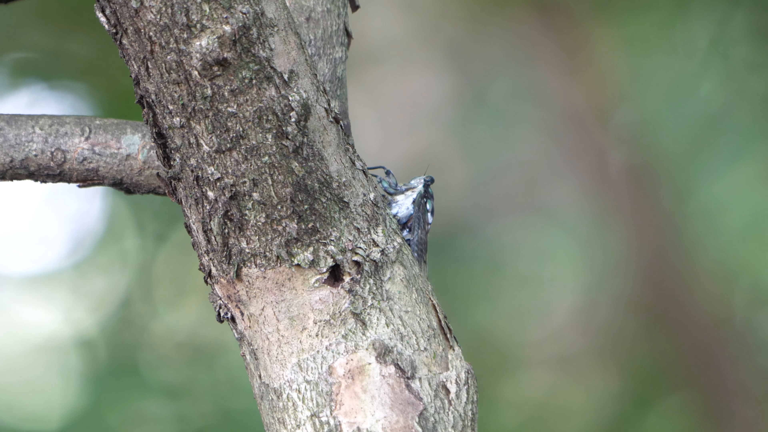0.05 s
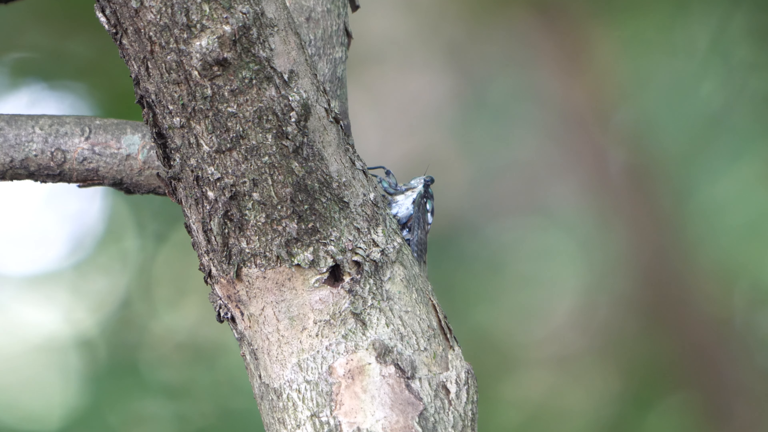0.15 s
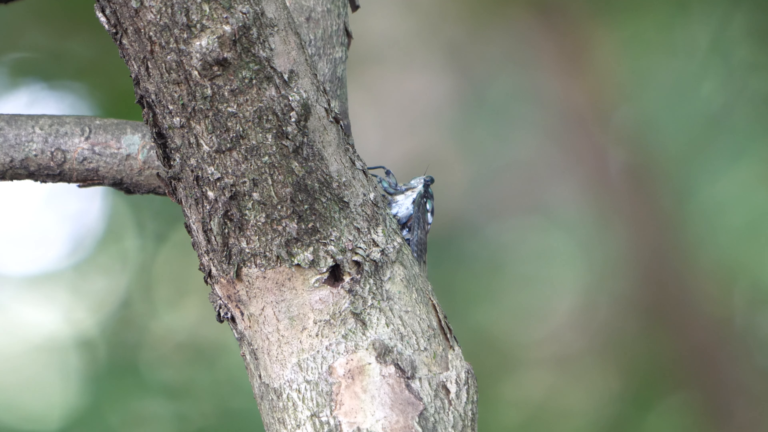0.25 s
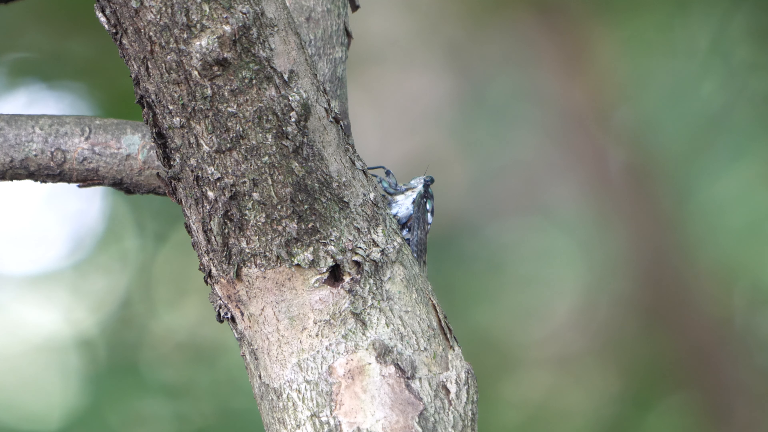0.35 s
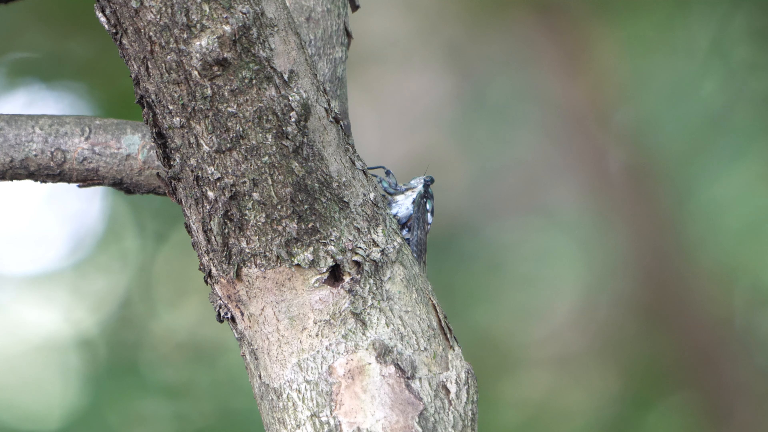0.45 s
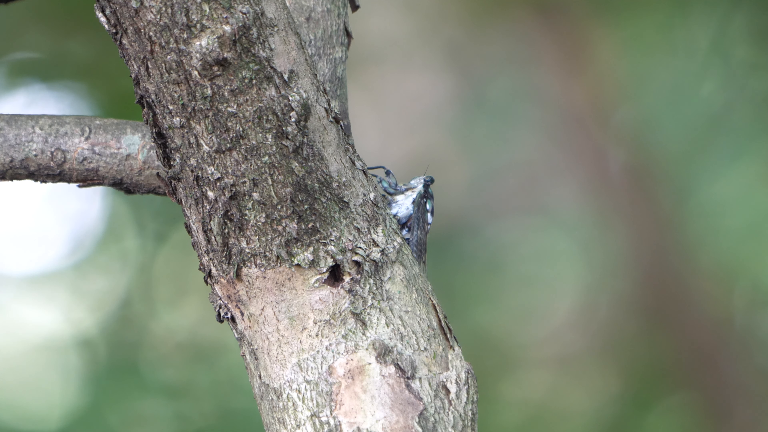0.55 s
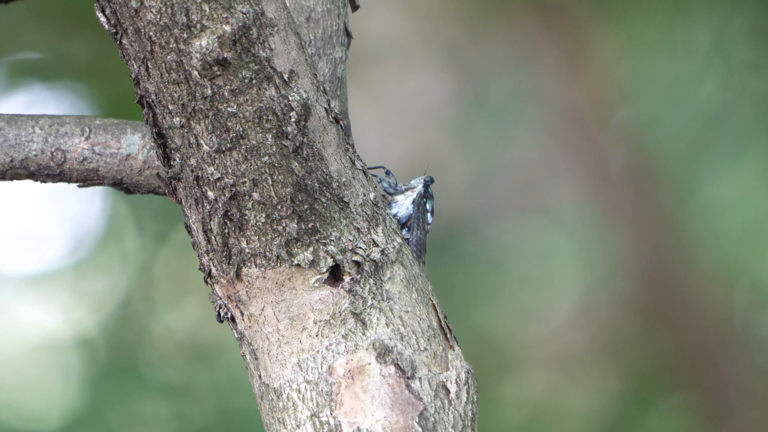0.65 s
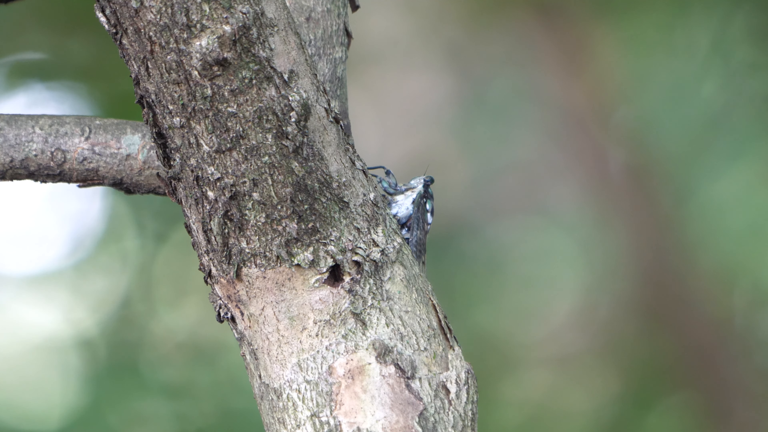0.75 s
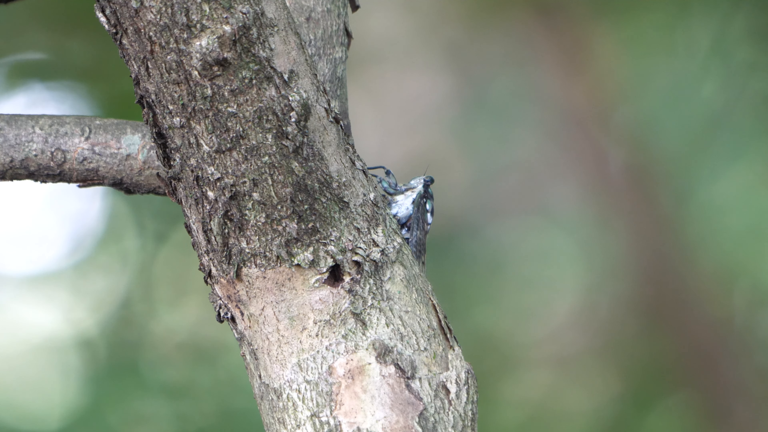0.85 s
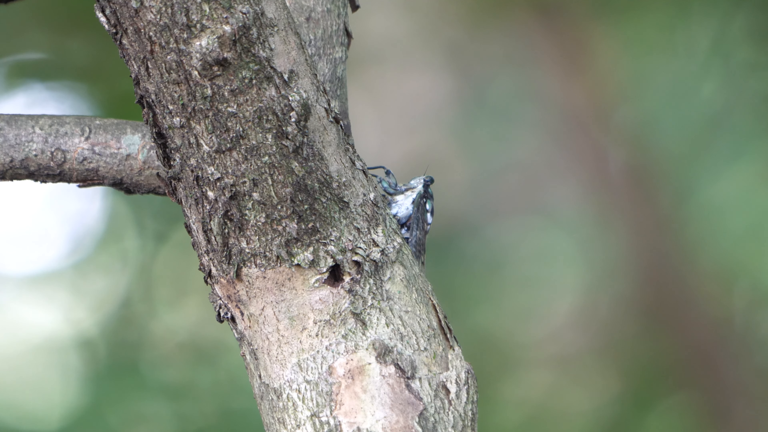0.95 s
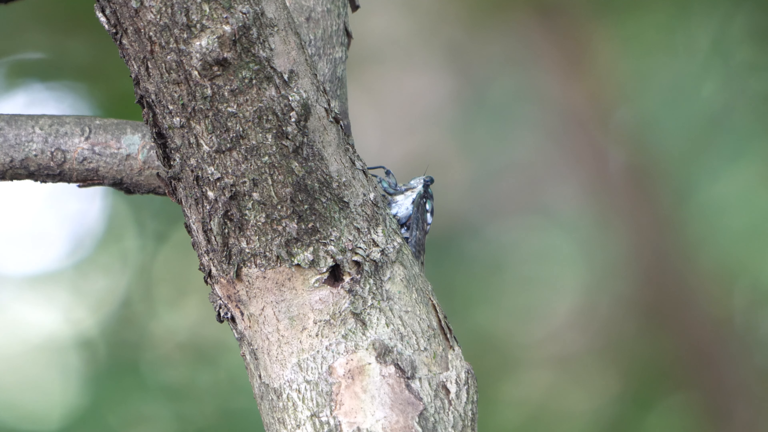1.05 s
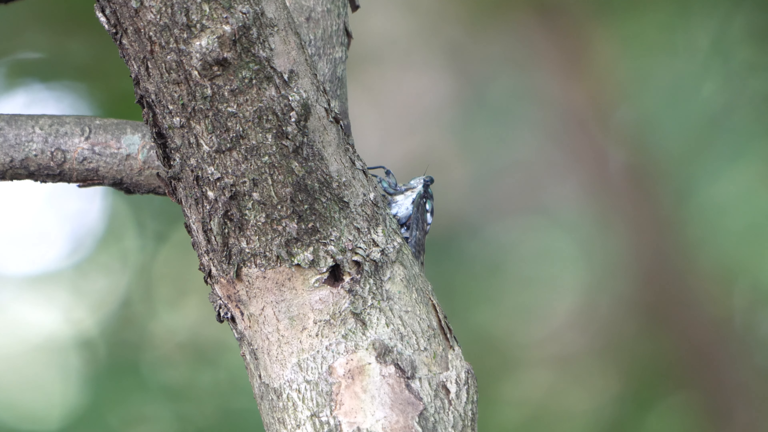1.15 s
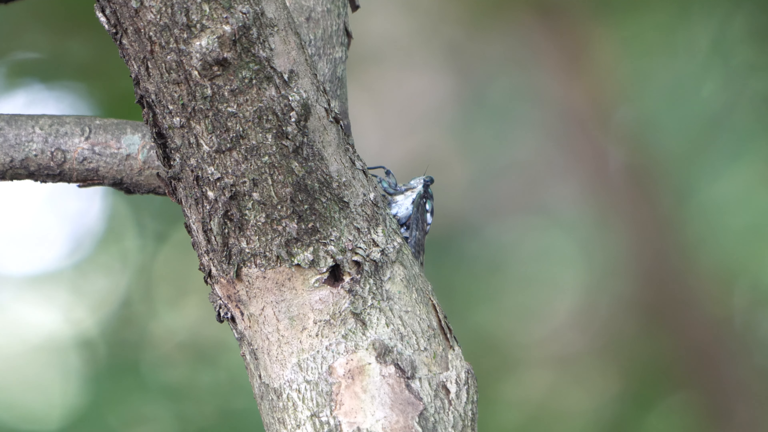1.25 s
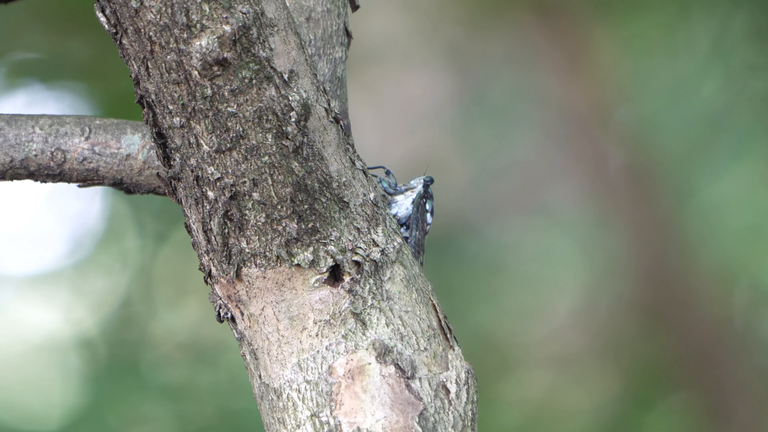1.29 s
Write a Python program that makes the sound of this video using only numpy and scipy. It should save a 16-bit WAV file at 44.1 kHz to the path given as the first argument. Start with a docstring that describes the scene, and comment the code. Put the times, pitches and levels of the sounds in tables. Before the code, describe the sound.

A close cicada rattles dryly, climbs into a whining call, ticks through short pauses, then rattles and whines again over a distant cicada chorus.

```python
"""A cicada on a trunk, first heard well into a long dry rattle, goes into a rising whine.
Pauses of thin ticking and two short notes follow, then a fast rattle that runs down; then whine, pause, note.
Two tymbals click in turn into a hollow belly, whose resonance moves as it stretches and relaxes.
Throughout: a far chorus of buzzing resonators with single swells, fuzzy noise whistles at times,
and a low rumble of distant traffic made of filtered noise."""
import sys
import numpy as np
from scipy import signal
from scipy.fft import rfft, irfft
from scipy.io import wavfile
from scipy.ndimage import uniform_filter1d

SR = 44100
rng = np.random.default_rng(int(sys.argv[2]) if len(sys.argv) > 2 else 0)


def store_wav(level_fs):
    """Save 16-bit WAV to argv[1]."""
    pcm = np.round(np.clip(np.atleast_2d(level_fs), -1, 1) * 32767)
    wavfile.write(sys.argv[1], SR, pcm.T.astype(np.int16))


N = 366030
TIME = np.arange(N) / SR
WAVERS_PER_S = 5.83  # corner scale of the singer's slow drifts


def gain_of(db):
    """dB to amplitude ratio."""
    return 10 ** (np.asarray(db) / 20)


def evened(x):
    """Scales to rms 1."""
    return x / np.sqrt(np.mean(x ** 2) + 1e-20)


def levelled(x, size):
    """Holds the running rms near 1; size in samples."""
    power = uniform_filter1d(uniform_filter1d(x ** 2, size), size)
    return x / np.sqrt(abs(power) + 1e-20)


def follow(rows, at):
    """Interpolates each later column of a table linearly along its first."""
    places, *columns = np.transpose(rows)
    return [np.interp(at, places, column) for column in columns]


def wander(hz):
    """Gaussian low-passed noise of rms 1: a slow random drift."""
    roll_off = np.exp(-(np.fft.rfftfreq(N, 1 / SR) / hz) ** 2)
    return evened(irfft(rfft(rng.standard_normal(N)) * roll_off, N))


def colour(x, points, size=8192):
    """Minimum-phase filter through (f/Hz, level/dB) points."""
    hz, db = np.transpose(points)
    bin_hz = abs(np.fft.fftfreq(size, 1 / SR))
    log_gain = np.log(gain_of(np.interp(np.log(bin_hz + 1), np.log(hz), db)))
    taps = np.fft.ifft(np.exp(np.conj(signal.hilbert(log_gain)))).real
    return signal.oaconvolve(x, taps[:size // 2])[:N]


def resonate(x, hz, width_hz):
    """One-pole resonance of peak gain 1, at a fixed or moving frequency."""
    turn = np.exp(2j * np.pi * np.cumsum(hz * np.ones(N)) / SR)
    r = np.exp(-np.pi * width_hz / SR)
    shifted = x / turn + 1e-18
    return 2 * (turn * signal.lfilter([1 - r], [1, -r], shifted)).real


def spread(x, hz, width_hz):
    """All-pass ringing: draws clicks out in time, magnitude spectrum unchanged."""
    r = np.exp(-np.pi * width_hz / SR)
    poles = np.array([1, -2 * r * np.cos(2 * np.pi * hz / SR), r * r])
    return signal.lfilter(poles[::-1], poles, x)


def scatter(x, t60_s, size=20000):
    """Sparse decaying echoes from bark, branches and leaves, of energy 1."""
    t_s = np.arange(size) / SR
    taps = rng.standard_normal(size) * (rng.random(size) < .1) * 1000 ** (-t_s / t60_s)
    return signal.oaconvolve(x, taps / np.linalg.norm(taps))[:N]


def wood(x, count=3):
    """Independently fluttering echo sets, which blur the overtones."""
    echoes = sum(scatter(x * wander(45), t60_s=.18) for _ in range(count))
    return echoes / np.sqrt(count)


def strokes(rate, lag, jitter_s, uneven_db):
    """One band-limited click per cycle, lag cycles late, random in timing and size."""
    turns = np.cumsum(rate) / SR - lag
    at = np.flatnonzero(np.diff(np.floor(turns)) > 0)
    late, size = rng.standard_normal((len(at), 2)).T
    to_crossing_s = (np.ceil(turns[at]) - turns[at]) / rate[at]
    place = at + SR * (to_crossing_s + late * (jitter_s * np.ones(N))[at])
    near = np.floor(place).astype(int)[:, None] + np.arange(-8, 9)
    off = near - place[:, None]
    clicks = np.sinc(off) * np.sinc(off / 9)  # windowed sinc: sub-sample placement
    clicks *= gain_of(size * (uneven_db * np.ones(N))[at])[:, None]
    return np.bincount(np.clip(near, 0, N - 1).ravel(), clicks.ravel(), N)


def raggedness(rate):
    """0 for fast even strokes, 1 for a slow rattle."""
    return np.clip((182 - rate) / 45, 0, 1) ** 1.4


# colour of a tymbal click: f/Hz, level/dB
CLICK_COLOUR = [(900, -43.5), (1500, -15), (2000, -7), (2500, 1.5), (3000, 4.5), (3500, 5), (4400, 1.5),
                (5200, 0.5), (5600, -4), (6000, -8.5), (6400, -2), (6800, -4), (7150, -5), (7520, -11),
                (7700, -6.5), (8000, -7.5), (8600, -12.5), (9200, -19.5), (12000, -18)]
# narrow body resonances: f/Hz, width/Hz, level/dB
BODY_MODES = [(2850, 43, 3), (3345, 110, 0), (3955, 25, 3), (4340, 150, -2.5), (4520, 170, 0.5),
              (5067, 70, -10), (5380, 200, -8), (5944, 100, 2), (6330, 190, -1.5), (6740, 89, 1)]
# lows lost as the belly stretches: belly f/Hz, lows level/dB
STRETCH_LOWS = [(3420, 2), (4470, -1.5), (4700, -1), (5000, -7)]


def song(rate, lag, belly_hz, effort_db, treble_db, tip_db):
    """Two tymbals buckle in turn into a resonant belly: even when fast, ragged when slow."""
    ragged = raggedness(rate)
    slack = np.clip((3900 - belly_hz) / 800, 0, 1)
    belly_hz = belly_hz + 30 * wander(17)
    lows_db, = follow(STRETCH_LOWS, belly_hz)
    jitter_s = 6e-6 + 1.1e-4 * ragged + 1e-5 * slack
    uneven_db = 1.2 + 1.5 * ragged
    second_lag = lag + .0025 * wander(WAVERS_PER_S)
    first = strokes(rate, 0, jitter_s, uneven_db)
    clicks = first + .84 * strokes(rate, second_lag, jitter_s, uneven_db)
    # belly stretch and opening set the balance of lows and treble
    lows = signal.sosfiltfilt(signal.butter(4, 3800, fs=SR, output="sos"), clicks)
    treble = signal.sosfiltfilt(signal.butter(2, 5600, "high", fs=SR, output="sos"), clicks)
    clicks = clicks + treble * (gain_of(treble_db) - 1) + lows * (gain_of(lows_db) - 1)
    sound = colour(resonate(resonate(clicks, belly_hz, 1970), belly_hz, 2100), CLICK_COLOUR)
    # sharp tip of the resonance picks out single overtones
    sound = sound + gain_of(tip_db) * resonate(sound, belly_hz, 180)
    modes = sum(gain_of(db) * resonate(sound, hz, width_hz) for hz, width_hz, db in BODY_MODES)
    sound = sound + modes * (1 - .19 * ragged)
    for hz, _, _ in BODY_MODES:  # body rings on between strokes
        sound = spread(sound, hz, width_hz=115)
    sound = sound + .18 * scatter(sound, t60_s=.05)
    sound = sound + gain_of(-5 + 5 * ragged) * wood(sound)
    return gain_of(effort_db + .76) * levelled(sound, size=1500)


# colour of the ticks: f/Hz, level/dB
TICK_COLOUR = [(6000, -20), (7700, -7), (9600, -23), (10600, -2), (11500, -5), (12700, 5), (13500, -7),
               (14400, -1), (15600, -12)]


def ticks(rate, ticking_db):
    """Bare tymbal snaps, near side louder; in faint ticking the echoes dominate."""
    jitter_s = 6e-6 + 2.5e-4 * raggedness(rate) ** 2
    far_side = .5 * strokes(rate, 1 / 2, jitter_s, 1.5)
    snaps = colour(strokes(rate, 0, jitter_s, .84) + far_side, TICK_COLOUR)
    bare = np.clip((ticking_db + 60) / 12, .2, 1)
    fluttering = snaps * (.9 + .45 * wander(150))
    echoes = .65 * scatter(fluttering, t60_s=.12)
    return gain_of(ticking_db) * levelled(bare * snaps + echoes, size=700)


# rattle strokes: t/s from start, rate/(strokes/s)
RATTLE_STROKES = [(0, 186), (.08, 177), (.18, 148), (.3, 124), (.52, 110), (.85, 102), (1.35, 91),
                  (1.9, 81.5), (2.5, 78)]
# surges and lulls of effort: t/s, level change/dB, belly shift/Hz
EFFORT_SURGES = [(0.09, 2, -150), (0.33, 0, 0), (0.56, 3.5, -500), (1.0, 2, 250), (1.35, 2.5, -600),
                 (1.6, -10, 0), (1.78, 4, -100), (1.98, -31, 0), (4.75, 2, 0), (5.0, -3, 100),
                 (5.18, 1.5, -550), (5.29, 2.5, 100), (5.39, -2.5, 200), (5.74, 1, -500), (5.83, -0.5, 0),
                 (5.98, 4, -250), (6.12, 2.5, -400), (6.451, -1, 300), (6.71, 2.5, -600), (6.86, 1.5, 100)]


def rattle(t, db):
    """Muscles tire, fast then slowly, with surges: strokes slow, belly relaxes, level sinks."""
    tired = t / (t + .1)
    surge_db, surge_hz = sum(np.outer(size, np.exp(-((TIME - s) / .054) ** 2))
                             for s, *size in EFFORT_SURGES)
    rate, = follow(RATTLE_STROKES, t)
    from_hz, to_hz, relax_s = 4450, 4005, .55
    belly_hz = from_hz + (to_hz - from_hz) * t / (t + relax_s)
    belly_hz = belly_hz + surge_hz + 121 * tired * wander(WAVERS_PER_S)
    drop_db, fade_db_per_s, waver_db = 6, 1.77, .94
    effort_db = db - drop_db * tired - fade_db_per_s * t + surge_db
    effort_db = effort_db + waver_db * wander(WAVERS_PER_S)
    lag, treble_db = .478, -1  # lag in cycles
    tip_db = 4 - 17 * tired
    ticking_db = -59 - 2.5 * tired
    return rate, lag, belly_hz, effort_db, treble_db, tip_db, ticking_db


# whine, belly stretches, peaks, lets go: t/s from start, belly f/Hz, effort/dB, treble/dB,
# resonance tip/dB, ticking/dB
WHINE_BELLY = [(0, 2980, -2, 12, -8, -53), (.055, 3260, -0.5, 16.5, -4, -60), (.1, 4500, -1.5, 14, -8, -59),
               (.2, 4480, -4, 15, 2, -59), (.33, 4700, -0.5, 4, -11, -59), (.45, 4870, -0.5, 9, -8, -58),
               (.53, 5030, 4.5, 4, 10, -59), (.62, 4980, 2, 8, 4.5, -57), (.69, 5080, 2, 4, 0, -58),
               (.72, 4180, 0, 13, 0, -58), (0.75, 3320, 0.5, 8, -12, -55), (.82, 3250, -2.5, -14, -19, -54),
               (.88, 3450, -3.5, -13, -10, -51)]
# whine strokes speed up, then ease: t/s from start, rate/(strokes/s), second tymbal lag/cycles
WHINE_STROKES = [(0, 178, .48), (.04, 177.8, .48), (.085, 173.7, .475), (.16, 175.4, .473),
                 (.27, 179, .478), (.37, 181.8, .481), (.48, 184.2, .482), (.58, 186.4, .482),
                 (.7, 188.9, .482), (.735, 190.6, .478), (.78, 189.3, .472), (.88, 188, .472)]


def whine(t, db, held_s):
    """Fast strokes into a stretching belly give a rising call, its top held for held_s more."""
    t = t - np.clip(t - .66, 0, held_s)
    belly_hz, effort_db, treble_db, tip_db, ticking_db = follow(WHINE_BELLY, t)
    rate, lag = follow(WHINE_STROKES, t)
    return rate, lag, belly_hz, db + effort_db, treble_db, tip_db, ticking_db


# near-steady strokes of pauses and notes: t/s, rate/(strokes/s), second tymbal lag/cycles
STEADY_STROKES = [(3.09, 187.7, .48), (3.28, 185.6, .485), (3.39, 186.4, .476), (3.46, 188.3, .472),
                  (3.6, 188.3, .469), (3.93, 188, .471), (4.1, 187.4, .468), (4.17, 186.5, .468),
                  (4.22, 186.5, .447), (4.48, 186.2, .447), (7.96, 188.7, .474), (8.13, 186, .48),
                  (8.3, 186.8, .473)]


def steady_strokes():
    """Tymbals keep going almost unchanged through pauses and notes."""
    return follow(STEADY_STROKES, TIME)


def pause(t, db, belly_hz, tip_db):
    """Belly drawn in: the low hum fades while the bare ticking swells through."""
    rate, lag = steady_strokes()
    fade_db_per_s, treble_db = 23, 8
    ticking_db = np.interp(t, [0, .089], [-50.5, -45])
    return rate, lag, belly_hz, db - fade_db_per_s * t, treble_db, tip_db, ticking_db


def note(t, db):
    """One quick stretch: belly resonance climbs and treble opens."""
    rate, lag = steady_strokes()
    rise_s, close_s, tip_db = .17, .081, -12.5
    belly_hz = np.interp(t, [0, rise_s], [4250, 4850])
    treble_db = np.interp(t, [0, rise_s], [-3, 3])
    ticking_db = np.interp(t, [rise_s, rise_s + close_s], [-57, -50.5])
    return rate, lag, belly_hz, db, treble_db, tip_db, ticking_db


# Each part lasts until the next begins; levels are base efforts.
# rattles, the first already under way: t/s, level/dB
RATTLE_STARTS = [(-0.38, -23), (4.48, -21)]
# whines: t/s, level/dB, extra hold at top/s
WHINE_STARTS = [(2.22, -24.5, 0.0047), (7.05, -24.5, 0.037)]
# pauses: t/s, level/dB, belly f/Hz, resonance tip/dB
PAUSE_STARTS = [(3.09, -30.5, 3640, -15), (3.614, -29, 3270, 8), (4.18, -28, 3380, -8.5),
                (7.96, -37, 3470, -10)]
# notes: t/s, level/dB
NOTE_STARTS = [(3.384, -25.5), (3.955, -23), (8.22, -28)]


def performance():
    """Joins the parts into smoothed controls: rate, lag, belly, effort, treble, tip, ticking."""
    kinds = (whine, WHINE_STARTS), (pause, PAUSE_STARTS), (note, NOTE_STARTS), (rattle, RATTLE_STARTS)
    parts = [(row, part) for part, table in kinds for row in table]
    parts.sort(key=lambda pair: pair[0])
    controls = np.zeros(N)
    for (start_s, *settings), part in parts:
        t = np.maximum(TIME - start_s, 0)
        values = np.broadcast_arrays(*part(t, *settings))
        controls = np.where(TIME >= start_s, values, controls)
    change_s = .032  # passage from part to part
    rate, *others = uniform_filter1d(controls, round(change_s * SR), axis=1)
    return rate * (1 + .00119 * wander(WAVERS_PER_S)), *others


# colour of the far chorus: f/Hz, level/dB
CHORUS_COLOUR = [(900, -50), (1500, -21.5), (2000, -11), (2500, -2.5), (3100, 5), (4100, -1), (4700, -4.5),
                 (5400, -5.5), (5900, -7.5), (6600, -11), (7500, -23), (9200, -41), (10500, -24),
                 (12700, -54), (15000, -70)]
# loudness of the far chorus: t/s, level/dB
CHORUS_LEVEL = [(0, -27), (2, -27), (2.8, -25.5), (3.3, -26.5), (3.8, -27), (4.35, -27.5), (5, -29),
                (6.5, -28.5), (7.6, -26.5), (8.05, -27.5), (8.3, -25)]


def chorus(count=4):
    """Far cicadas: click trains in drifting resonances, smeared by the trees."""
    voices = np.zeros(N)
    for rate in np.linspace(150, 200, count):
        stretch = wander(2.2)  # belly opens: faster, higher, louder
        clicks = strokes(rate * (1 + .02 * stretch), 0, 2e-5, 3)
        belly_hz = 4150 + 700 * np.tanh(stretch)
        voice = gain_of(2.4 * stretch) * resonate(clicks, belly_hz, 600)
        voices += scatter(voice + .2 * clicks, t60_s=.26)
    level_db, = follow(CHORUS_LEVEL, TIME)
    return gain_of(level_db) * levelled(colour(voices, CHORUS_COLOUR), size=12000)


# single far cicadas: t/s, length/s, mid-swell belly f/Hz, peak level/dB
SWELLS = [(0.584, 0.24, 4800, -33.5), (1.603, .17, 5300, -40.5), (1.78, 0.37, 5070, -46),
          (3.673, 0.3, 4530, -33), (5.497, 0.29, 4070, -39), (5.845, 0.13, 5250, -33),
          (6.22, 0.4, 5000, -34), (6.965, 0.13, 5300, -43)]


def far_swells():
    """Single far click trains swell and fade, their resonance climbing."""
    rate, climb_hz, width_hz = 176, 200, 430  # rate in strokes/s
    out = np.zeros(N)
    for start_s, length_s, hz, db in SWELLS:
        along = np.clip((TIME - start_s) / length_s, 0, 1)
        clicks = strokes(rate * (1 + .02 * wander(WAVERS_PER_S)), 0, 5e-5, 3)
        belly_hz = hz + climb_hz * (along - .5)
        buzz = resonate(resonate(clicks, belly_hz, width_hz), belly_hz, width_hz)
        buzz = scatter(buzz, t60_s=.15)
        arch = np.sqrt(abs(np.sin(np.pi * along)))
        out += gain_of(db) * arch * levelled(buzz, size=3000)
    return out


# faint far calls: t/s, length/s, f/Hz, peak level/dB
CALLS = [(0.24, 0.07, 1210, -56), (2.84, 0.42, 1700, -60), (3.4, 0.38, 1690, -61), (4.95, 0.22, 1700, -57),
         (7.694, 0.58, 1740, -57)]


def far_calls():
    """Soft fuzzy whistles from deep in the wood: arched narrow-band noise."""
    out = np.zeros(N)
    for start_s, length_s, hz, db in CALLS:
        along = np.clip((TIME - start_s) / length_s, 0, 1)
        arch = np.sqrt(abs(np.sin(np.pi * along)))
        whistle = resonate(resonate(rng.standard_normal(N), hz, 110), hz, 110)
        out += gain_of(db) * arch * evened(whistle)
    return out


# relative spectrum of distant traffic: f/Hz, level/dB
RUMBLE_COLOUR = [(20, -31), (45, -14), (64, -4.5), (100, -1.5), (160, -4), (230, -3), (340, -7.5),
                 (440, -4.5), (600, -10), (1100, -12.5), (1600, -14), (3000, -2.5), (9000, -24),
                 (15000, -42)]
# drone in the traffic: f/Hz, width/Hz, level/dB
DRONE_BANDS = [(129.5, 11.7, -56.5), (197, 33, -56), (284.1, 12.7, -62)]


def traffic():
    """Distant traffic: steady coloured noise plus wavering narrow-band drones."""
    out = gain_of(-44) * evened(colour(rng.standard_normal(N), RUMBLE_COLOUR))
    for hz, width_hz, db in DRONE_BANDS:
        drone = resonate(resonate(rng.standard_normal(N), hz, width_hz), hz, width_hz)
        out = out + gain_of(db) * evened(drone)
    return out


def scene():
    """Near cicada plus the wood around it."""
    rate, lag, belly_hz, effort_db, treble_db, tip_db, ticking_db = performance()
    cicada = song(rate, lag, belly_hz, effort_db, treble_db, tip_db) + ticks(rate, ticking_db)
    return (cicada + chorus() + far_swells() + far_calls() + traffic())[None]


def record(dry):
    """Recorder band limit: linear-phase low-pass."""
    edge_hz = 15700
    taps = signal.firwin(511, edge_hz, window=("kaiser", 9), fs=SR)
    return signal.oaconvolve(dry, taps[None], "same")


dry = scene()
out = record(dry)
store_wav(out)
```